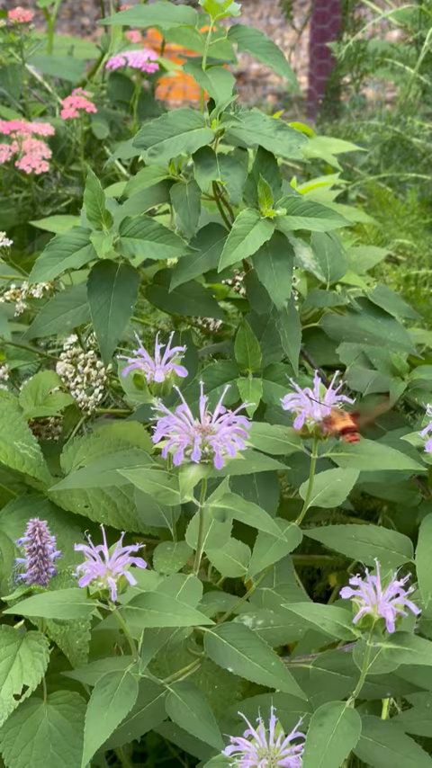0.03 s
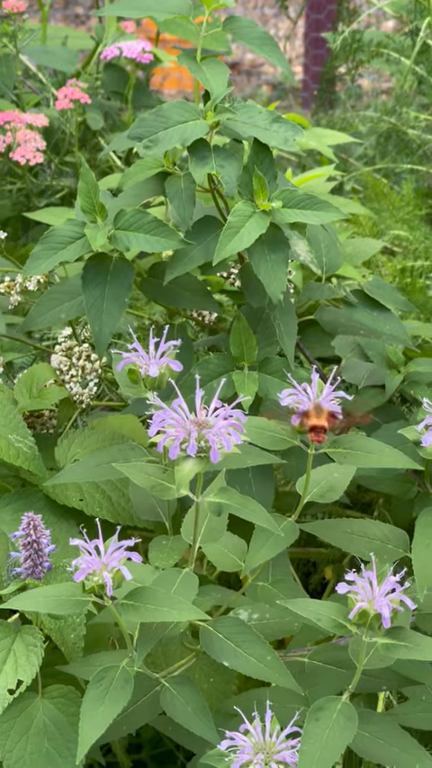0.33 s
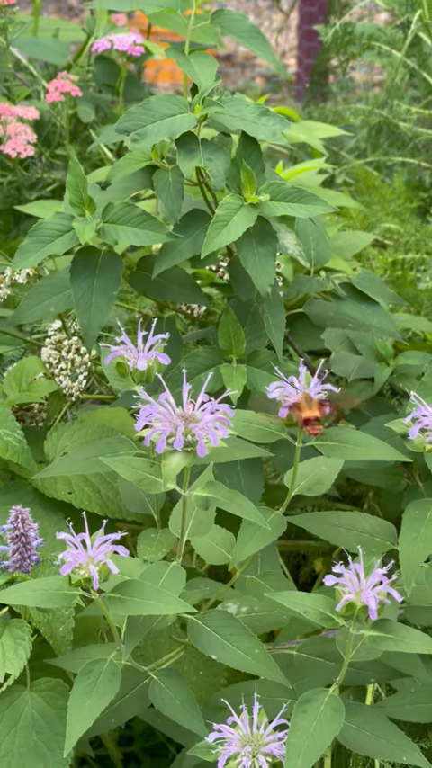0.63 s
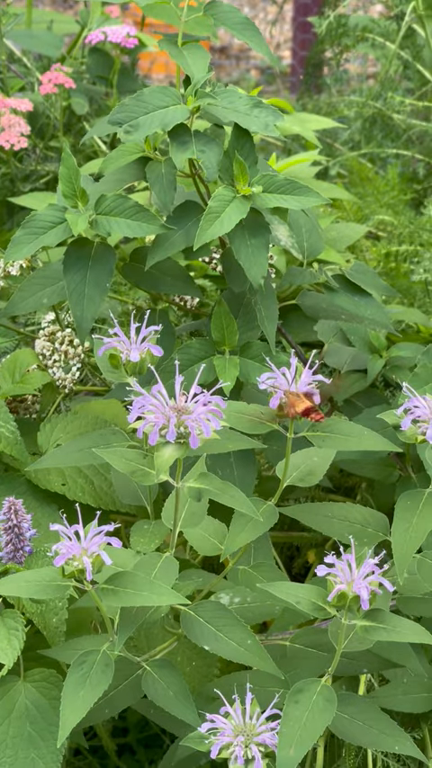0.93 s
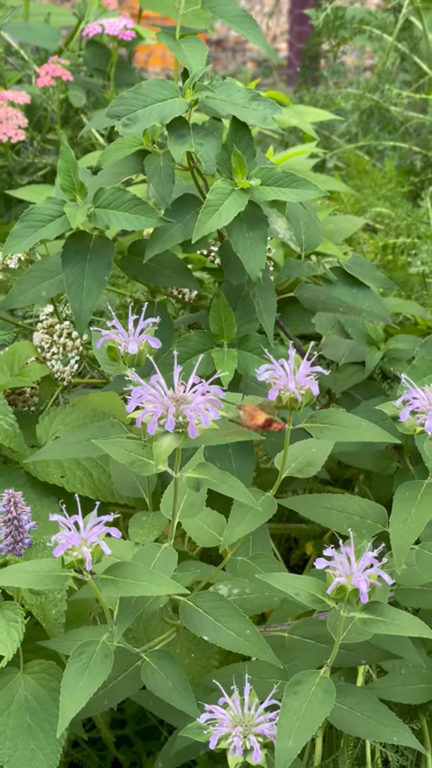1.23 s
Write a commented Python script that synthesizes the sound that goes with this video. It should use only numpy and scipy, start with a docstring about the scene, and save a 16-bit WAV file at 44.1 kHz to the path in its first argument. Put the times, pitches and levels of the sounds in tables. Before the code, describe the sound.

Soft wind rumbles steadily on a phone microphone in a garden. Faint leaf rustles and a brief dry flutter of wings come first, followed by thin, scattered bird chirps and a few small twig-like knocks amid more rustling.

```python
"""A quiet flower garden on a handheld phone. Low outdoor rumble and a wash of moving air throughout.
Leaves swish softly from the start, some with a crisp top; near 1 s a moth's wings tick against petals.
From 1.5 s small birds call thinly, scattered by the trees. From 2.5 s the leaves swish more often,
with four small knocks up to 3.1 s; the rumble peaks just after."""
import sys
import numpy as np
from scipy import signal
from scipy.fft import rfft, irfft
from scipy.io import wavfile
from scipy.ndimage import uniform_filter1d

SR = 44100
rng = np.random.default_rng(int(sys.argv[2]) if len(sys.argv) > 2 else 0)


def to_wav(s):
    """Save 16-bit WAV."""
    ch = np.atleast_2d(s).T  # columns
    pcm = np.round(np.clip(ch, -1, 1) * 32767)  # PCM
    wavfile.write(sys.argv[1], SR, pcm.astype(np.int16))


N = 176400
TIME_S = np.arange(N) / SR
FREQ_HZ = np.maximum(np.arange(N // 2 + 1) * SR / N, 1)

# outdoor air spectrum: freq_hz, relative_db
AIR_SPECTRUM = [(20, -102), (32, -94), (42, -80), (53, -65), (65, -69), (105, -69.5), (150, -79),
                (220, -85.5), (450, -91), (800, -91), (1400, -100), (2100, -106), (3700, -115),
                (4250, -121), (6500, -122), (7400, -114), (8200, -113), (9000, -121), (10900, -118),
                (12000, -128), (13500, -138)]
# rumble envelope: time_s, gain_db
RUMBLE_ENVELOPE = [(0, -3), (.9, -0.3), (1.4, 0), (2.4, -1.1), (3.2, 3.5), (4, 1.5)]
# wash envelope: time_s, gain_db
WASH_ENVELOPE = [(0, 1.04), (2.4, -0.44), (2.9, 1.65), (3.3, 0.83), (4, -0.0013)]
# air, left over right: freq_hz, balance_db
AIR_BALANCE = [(100, -.5), (380, -3.5), (680, -0.8), (1200, 4), (2100, -0.3)]
# air, side over mid: freq_hz, width_db
AIR_WIDTH = [(40, -32), (110, -25), (200, -15), (480, -6), (800, -5.5), (1150, -1.5), (1750, -17),
             (4000, -16), (9000, -20)]
# bird notes: start_s, length_s, start_hz, end_hz, flutter_ratio, relative_db
BIRD_NOTES = [(1.51, .06, 6600, 7000, .032, -79.5), (1.6, .05, 6600, 7200, .028, -82),
              (2.08, .075, 6850, 7400, .018, -67.5), (2.095, .06, 2350, 2550, .13, -69),
              (2.22, .06, 3850, 4000, .03, -82), (2.54, .1, 2090, 2080, .008, -81),
              (2.648, .045, 2160, 2170, .004, -70), (2.69, .14, 2165, 2175, .01, -76),
              (2.86, .09, 3100, 2950, .08, -76), (2.925, .095, 6550, 7270, .02, -65.7),
              (3.66, .13, 6650, 7400, .028, -67.7), (3.81, .1, 7150, 7400, .028, -73.5),
              (3.828, .092, 3050, 3880, .05, -67.7)]
# leaf swishes: centre_s, width_s, level_db
LEAF_SWISHES = [(.148, .03, -77), (.435, .04, -71), (.565, .09, -76), (.98, .06, -72.5), (1.15, .1, -75.5),
                (2.122, .045, -74), (2.555, .045, -69.5), (2.63, .06, -73), (2.74, .08, -76),
                (2.86, .11, -68.5), (3.0, .1, -68), (3.18, .06, -76), (3.34, .13, -73.5), (3.56, .13, -75),
                (3.74, .12, -75), (3.87, .1, -68.5)]
# leaf scrape spectrum: freq_hz, relative_db
LEAF_SPECTRUM = [(900, 4), (2500, -3), (4200, -2), (6000, -2.3), (8000, -1.5), (9000, -2), (10800, 4.5),
                 (12000, -9), (13600, -28)]
# knocks: start_s, body_db, crackle_db, crackle_width_s
KNOCK_HITS = [(2.632, -45, -65.5, .003), (2.7025, -47.5, -64.5, .005), (2.7905, -41.5, -57.3, .0035),
              (3.0635, -43.5, -56.5, .005)]
# knock body modes: pitch_hz, relative_db, t60_s
BODY_MODES = [(240, -5, .05), (400, -8.5, .03), (590, -6, .024), (820, -1.5, .024), (1100, -1, .018),
              (1450, -5, .015), (1950, -9, .012)]
# knock crackle spectrum: freq_hz, relative_db
CRACKLE_SPECTRUM = [(600, -6), (1500, 1), (2300, 1.5), (3300, 0), (4500, -7), (7000, -7.5), (9000, -20),
                    (13000, -42)]
# bright dry ticking (moth wings on petals near 1 s, elsewhere the crisp top of leaf rustles):
# centre_s, width_s, level_db
TICK_BURSTS = [(.56, .07, -78), (.81, .03, -79), (.889, .024, -67), (.94, .05, -71.5), (.985, .033, -63.5),
               (1.03, .055, -69.5), (1.108, .014, -60), (1.145, .02, -62.5), (1.177, .007, -65),
               (1.2, .06, -74.5), (1.34, .06, -80), (2.85, .03, -77)]
# tick spectrum: freq_hz, relative_db
TICK_SPECTRUM = [(2000, -22), (5000, -12.5), (7000, -24), (9000, 0.5), (10300, 8.5), (11100, 4.5),
                 (12000, -17), (14000, -22)]
# left microphone's phase lead: freq_hz, lead_rad
MIC_PHASE = [(0, 0), (300, -0.1), (620, 0.8), (1000, 1.3), (1220, 4.6), (1750, 6.3), (2600, 7.0),
             (4050, 7.1), (4600, 8.2), (5150, 11.1), (5700, 12.6), (6200, 12.6), (9000, 15.7), (9400, 15.7),
             (11600, 18.0), (12000, 18.9)]


def undb(db):
    """Decibels to gain."""
    return 10 ** (np.asarray(db) / 20)


def unit_rms(x):
    """Scale to rms 1."""
    return x / np.sqrt(np.mean(x ** 2))


def over_hz(points):
    """Table onto FFT bins, log-frequency interpolation."""
    hz, value = np.array(points, float).T
    return np.interp(np.log(FREQ_HZ), np.log(hz), value)


def colour(x, spectrum):
    """Filter by a spectrum table; rms 1."""
    return unit_rms(irfft(rfft(x) * undb(over_hz(spectrum)), N))


def noise():
    """White noise."""
    return rng.standard_normal(N)


def wander(rate_hz):
    """Smooth random drift; rms 1."""
    hold = max(int(SR / rate_hz), 1)
    steps = np.repeat(noise()[:N // hold + 1], hold)
    return unit_rms(uniform_filter1d(uniform_filter1d(steps, hold), hold)[:N])


def swell(centre_s, width_s):
    """Gaussian envelope; width is two sigma."""
    return np.exp(-2 * ((TIME_S - centre_s) / width_s) ** 2)


def swells(rows):
    """Power sum of swells."""
    return np.sqrt(sum((undb(db) * swell(centre_s, width_s)) ** 2 for centre_s, width_s, db in rows))


def air(level_db=-50, breeze_db=1.12, flicker_db=0.71, lowest_hz=30, rumble_top_hz=220):
    """Rumble and moving air: octave bands swell together, flicker alone; widest in the mids."""
    width = undb(over_hz(AIR_WIDTH))
    sides = np.array([[1], [-1]])
    spectrum = (rfft(noise()) + sides * width * rfft(noise())) / np.hypot(1, width)
    spectrum *= undb(over_hz(AIR_SPECTRUM) + sides * over_hz(AIR_BALANCE) / 2)
    spectrum /= np.std(irfft(spectrum, N))
    octave = np.clip(np.log2(FREQ_HZ / lowest_hz), 0, 9)
    shared_db = breeze_db * wander(3.6)
    out = 0
    for k in range(10):
        envelope = RUMBLE_ENVELOPE if lowest_hz * 2 ** k < rumble_top_hz else WASH_ENVELOPE
        gain_db = np.interp(TIME_S, *np.array(envelope).T) + shared_db + flicker_db * wander(14)
        band = irfft(spectrum * np.maximum(1 - abs(octave - k), 0), N)
        out += band * undb(gain_db)
    return out * undb(level_db)


def birds(glide_power=2.4, flutter_hz=800, direct_db=-5, trees_db=-6.5, trees_t60_s=0.47):
    """Thin notes that glide and level off, rasped by pitch flutter, scattered by trees."""
    song = 0
    for start_s, length_s, start_hz, end_hz, flutter_ratio, db in BIRD_NOTES:
        progress = np.clip((TIME_S - start_s) / length_s, 0, 1)
        glide_hz = end_hz + (start_hz - end_hz) * (1 - progress) ** glide_power
        pitch_hz = glide_hz * (1 + flutter_ratio * wander(flutter_hz))
        envelope = 2 * undb(db) * np.sin(np.pi * progress)
        song += envelope * np.sin(2 * np.pi * np.cumsum(pitch_hz) / SR)
    tail = noise() * undb(-60 * TIME_S / trees_t60_s)
    echo = signal.fftconvolve(song, tail / np.linalg.norm(tail))[:N]
    return undb(direct_db) * song + undb(trees_db) * echo


def leaves(grains_per_s=5000, scatter_db=2.5, flicker_db=0.99):
    """Dense tiny leaf-on-leaf scrapes in soft swishes."""
    grains = (rng.random(N) < grains_per_s / SR) * noise()
    grains *= undb(scatter_db * rng.exponential(size=N))
    return colour(grains, LEAF_SPECTRUM) * swells(LEAF_SWISHES) * undb(flicker_db * wander(40))


def knocks(detune_ratio=.07, attack_s=.0004, crackle_lead_s=.0005):
    """Short crackle into a dull, damped ring, like a twig giving way."""
    crackle = colour(noise(), CRACKLE_SPECTRUM)
    tunings = 1 + detune_ratio * rng.uniform(-1, 1, (len(KNOCK_HITS), len(BODY_MODES)))
    out = 0
    for (start_s, body_db, crackle_db, crackle_width_s), tuning in zip(KNOCK_HITS, tunings):
        age_s = np.maximum(TIME_S - start_s, 0)
        ring = 0
        for (pitch_hz, db, t60_s), ratio in zip(BODY_MODES, tuning):
            decay = undb(-60 * np.minimum(age_s / t60_s, 10))
            ring += undb(db) * decay * np.sin(2 * np.pi * (pitch_hz * ratio * age_s + rng.random()))
        out += undb(body_db) * ring * (1 - np.exp(-age_s / attack_s))
        out += undb(crackle_db) * swell(start_s - crackle_lead_s, crackle_width_s) * crackle
    return out


def wing_and_leaf_ticks(rate_hz=170, jitter_s=0.0012, decay_s=0.0005, scatter_db=2.5, hiss_db=-11.5):
    """Uneven dry ticks: wing strokes flicking petals near 1 s, elsewhere the crisp top of rustles."""
    cycles = (TIME_S + jitter_s * wander(130)) * rate_hz
    strength = undb(scatter_db * np.clip(noise(), -2, 2))[cycles.astype(int)]
    age_s = (cycles % 1) / rate_hz
    envelope = strength * np.exp(-age_s / decay_s) + undb(hiss_db)
    return colour(envelope * noise(), TICK_SPECTRUM) * swells(TICK_BURSTS)


def scene():
    """Stereo air plus centred sources."""
    return air() + leaves() + wing_and_leaf_ticks() + knocks() + birds()


def record(dry, mute_s=.036, lowpass_hz=13800):
    """Phone microphone pair: phase offset, brief opening mute, low-pass."""
    lead_rad = np.interp(FREQ_HZ, *np.array(MIC_PHASE).T)
    rotation = np.exp(1j * np.array([[1], [-1]]) * lead_rad / 2)
    heard = irfft(rfft(dry) * rotation, N) * (TIME_S > mute_s)
    lowpass = signal.ellip(8, .2, 70, lowpass_hz, fs=SR, output="sos")
    return signal.sosfilt(lowpass, heard)


dry = scene()
out = record(dry)
to_wav(out)
```